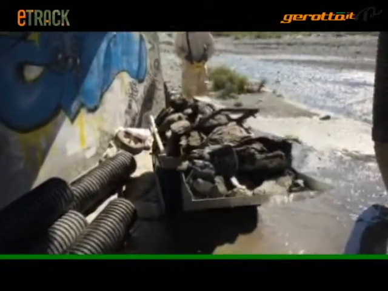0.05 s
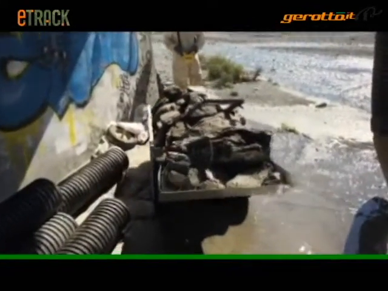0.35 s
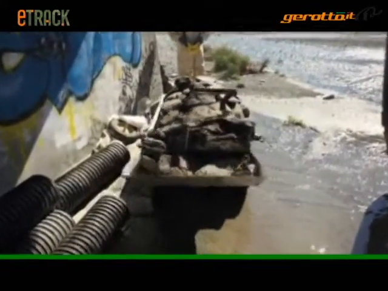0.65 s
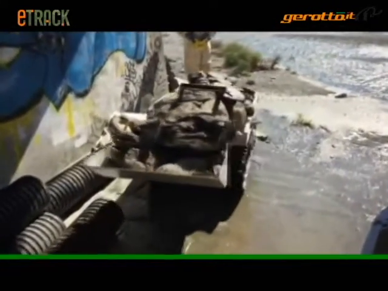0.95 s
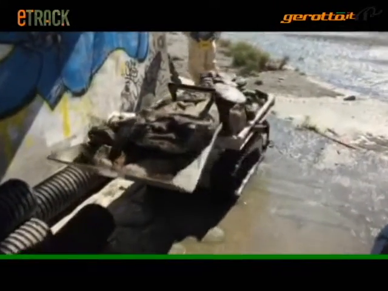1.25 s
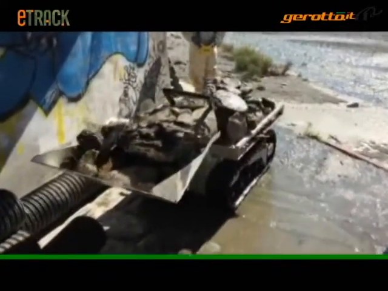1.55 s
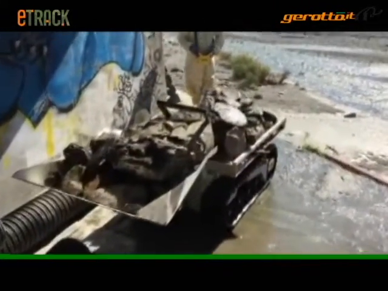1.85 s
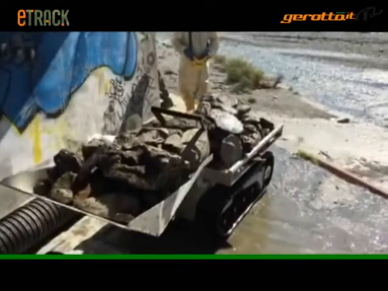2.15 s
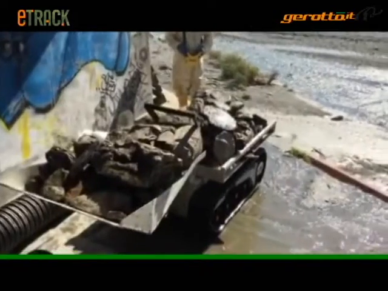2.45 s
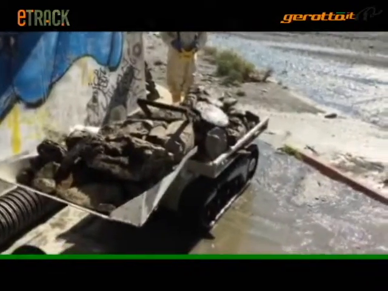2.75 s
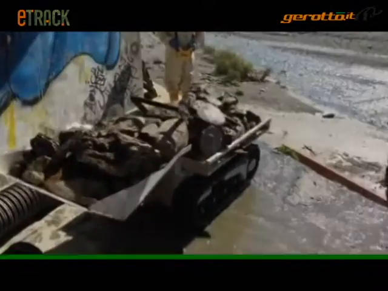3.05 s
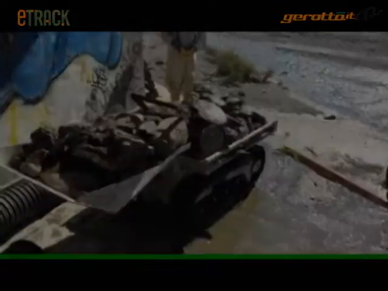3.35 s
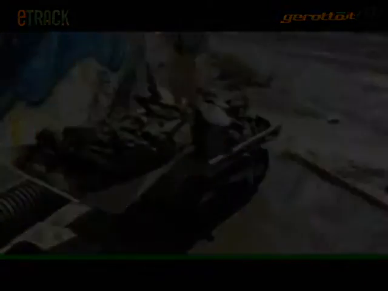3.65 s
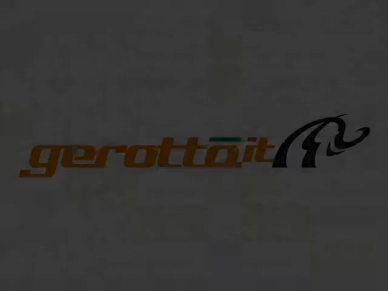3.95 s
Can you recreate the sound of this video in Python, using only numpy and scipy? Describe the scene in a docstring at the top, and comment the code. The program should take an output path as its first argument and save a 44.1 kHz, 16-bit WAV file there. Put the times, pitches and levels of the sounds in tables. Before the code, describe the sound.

A small tracked dozer grinds and rumbles close by on wet concrete outdoors. Steel scrapes, its loaded bucket clanks and thuds, and water hisses. It then creeps on more quietly with knocks and clinks before fading out.

```python
"""Tracks grind and rumble over a deep drive hum: a small dozer pivots on wet concrete beside a wall.
Sliding steel rasps and briefly squeals, the loaded bucket booms, thuds and clanks, and water sizzles.
The undercarriage knocks, stones crunch and track parts clink as the machine creeps forward and stops.
Friction and water are showers of tiny contacts; blows are clatters that set steel modes ringing.
The sound fades out at the end."""
import sys
import numpy as np
from scipy import signal
from scipy.fft import rfft, irfft
from scipy.io import wavfile
from scipy.ndimage import uniform_filter1d, map_coordinates

SR = 44100
rng = np.random.default_rng(int(sys.argv[2]) if len(sys.argv) > 2 else 0)


def persist_wave(psi):
    """Save psi, clipped to +-1, as 16-bit WAV."""
    counts = np.round(np.clip(psi, -1, 1) * 32767).astype(np.int16)
    wavfile.write(sys.argv[1], SR, np.atleast_2d(counts).T)


N = 176400
TOP_HZ = 10600  # the treble ends near here

# Modes of the bucket and hull. Each row: frequency in Hz, level in dB, t60 in seconds.
HULL_MODES = [(357, 1.5, 0.15), (405, -13.5, 0.25), (684, 0, 0.18), (897, -6.5, 0.19), (1008, -6.5, 0.12),
              (1180, -12.5, .2), (1424, -9.5, 0.25), (1537, -1, 0.14), (1644, -1, 0.062), (1826, -3, 0.1),
              (1910, -11, 0.15), (2343, -2, .17), (2307, -2, .3), (3176, -12, .2), (3640, 2, 0.12),
              (3957, 2, 0.098), (4410, -1.5, 0.22), (5200, -14, .2), (6158, -8.5, .14)]


def amp(db):
    """Decibels to gain."""
    return 10 ** (np.asarray(db) / 20)


def unit(x):
    """Scale to rms 1."""
    return x / np.sqrt(np.mean(x ** 2) + 1e-20)


def curves(rows):
    """One value per sample for each column after the time."""
    times, *columns = np.transpose(rows)
    return [np.interp(np.arange(N) / SR, times, column) for column in columns]


def wobble(rate):
    """A smooth random curve, rate knots a second."""
    return map_coordinates(rng.standard_normal(2000), [np.arange(N) * rate / SR], mode="wrap")


def coloured(x, colour, tilt_db=0):
    """x through an EQ curve of (Hz, dB) points and a tilt per octave, at rms 1."""
    hz = np.fft.rfftfreq(len(x), 1 / SR) + 1
    colour_hz, colour_db = np.transpose(colour)
    gain = amp(np.interp(np.log(hz), np.log(colour_hz), colour_db) + tilt_db * np.log2(hz / 1000))
    return unit(irfft(rfft(x) * gain * (hz < TOP_HZ + 500) * hz / (hz + 10), len(x)))


def add(track, start_s, x):
    """Mix x into the track at start_s."""
    start = max(0, round(start_s * SR))
    track[start:start + len(x)] += x[:max(0, N - start)]


def grains(rate, spread_db, size):
    """Random tiny contacts of unequal strength, rate a second."""
    hit = rng.random(size) < rate / SR
    sign = rng.choice([-1, 1], size)
    return unit(hit * sign * amp(spread_db * np.minimum(rng.exponential(size=size), 4)))


def ringing(x, modes):
    """x played into a set of decaying modes, at the same power."""
    t = np.arange(SR // 2) / SR
    ring = sum(amp(db - 60 * t / t60) * np.sin(2 * np.pi * (hz * t + rng.random()))
               for hz, db, t60 in modes)
    return unit(signal.fftconvolve(x, ring)[:len(x)]) * np.std(x)


def patchy(x, depth_db=3.3):
    """Narrow resonances come and go as the points of contact shift."""
    spectra = signal.stft(x, nperseg=1024)[2]
    patches = uniform_filter1d(rng.standard_normal(spectra.shape), size=3, axis=0)
    patches = uniform_filter1d(patches, size=11, axis=1)
    return unit(signal.istft(spectra * amp(depth_db * unit(patches)), nperseg=1024)[1][:len(x)])


def struck_spot(x, depth_db=2.8):
    """Each spot that is struck favours its own share of the many upper resonances."""
    hz = np.fft.rfftfreq(len(x), 1 / SR)
    ripple = map_coordinates(rng.standard_normal(300), [hz / 90], mode="wrap")
    return unit(irfft(rfft(x) * amp(depth_db * ripple * np.minimum(hz / 2500, 1)), len(x)))


def blows(rows, colour, modes, ring_db, attack_s, t60, tail_db, tail_t60):
    """Each blow is a short clatter that echoes off the wall and leaves the metal's modes ringing."""
    out, t = np.zeros(N), np.arange(SR // 2) / SR
    hz, mode_db, mode_t60 = np.transpose(modes)[:, :, None]
    colour_hz, colour_db = np.transpose(colour)
    struck_db = mode_db + np.interp(np.log(hz), np.log(colour_hz), colour_db)
    for start, db, length, *tilt in rows:
        after = np.maximum(t - length, 0)
        decay = np.hypot(amp(-60 * after / t60), amp(tail_db - 60 * after / tail_t60))
        envelope = (1 - np.exp(-t / attack_s)) * decay
        clatter = envelope * struck_spot(coloured(grains(9000, .8, len(t)), colour, *tilt))
        gains = amp(struck_db + sum(tilt) * np.log2(hz / 1000) + rng.normal(0, 3.9, hz.shape))
        waves = amp(-60 * after / mode_t60) * np.sin(2 * np.pi * (hz * t + rng.random(hz.shape)))
        ring = np.minimum(t / length, 1) * np.sum(gains * waves, axis=0) / np.linalg.norm(gains)
        add(out, start, amp(db) * (clatter + amp(ring_db) * ring))
    return out


def bursts(rows, colour, rate, spread_db, attack_s, t60):
    """Short showers of grains that rise, hold and die away without ringing."""
    out, t = np.zeros(N), np.arange(SR // 4) / SR
    for start, db, length in rows:
        envelope = (1 - np.exp(-t / attack_s)) * amp(db - 60 * np.maximum(t - length, 0) / t60)
        add(out, start, envelope * struck_spot(coloured(grains(rate, spread_db, len(t)), colour)))
    return out


def tracks():
    """The tracks rumble, and stick and slip over grit that shakes the hull."""
    # Rolling tracks. Each row: time in seconds, then rumble, grind and grit faders in dB.
    faders = [(0, -34, -29, -35.5), (.15, -40, -29, -38.5), (.21, -35, -32.5, -39.5),
              (.34, -34, -34, -36.5), (.45, -36, -31, -37.5), (.52, -34.5, -30.5, -33.5),
              (.61, -46, -32.5, -38.5), (.74, -32.5, -35, -34), (.82, -37, -35.5, -41.5),
              (1.02, -43.5, -33.5, -34), (1.21, -43, -32.5, -38.5), (1.46, -36.5, -37, -39),
              (1.72, -43, -38, -41.5), (2.09, -39, -43, -47), (2.37, -43, -40, -45.5),
              (2.48, -36.5, -42, -38.5), (2.55, -40, -39, -39.5), (2.8, -37, -40.5, -48.5),
              (2.96, -41, -38.5, -45.5), (3.14, -41.5, -40.5, -42), (3.27, -38.5, -38.5, -42.5),
              (3.39, -47, -39, -44), (3.58, -48, -44.5, -47.5), (3.88, -35, -40, -45)]
    # Low rumble, midrange grind, bright grit. Each row: frequency in Hz, gain in dB.
    rumble_eq = [(25, -30), (45, -3.5), (75, 3), (125, -0.5), (200, 0), (280, -6.5), (450, -17), (900, -56)]
    grind_eq = [(120, -54), (250, -4), (330, -0.5), (470, -8), (560, -1), (670, -2.5), (830, -0.5),
                (1000, -3), (1200, -18), (2000, -21), (5000, -69)]
    grit_eq = [(600, -17.5), (1150, 1.5), (1800, -1), (2350, -1), (2700, -4.5), (4200, -11.5), (5000, -18),
               (6000, -18.5), (7500, -35.5), (10000, -41.5)]
    rumble_db, grind_db, grit_db = curves(faders)
    grind_trim_db, grit_trim_db = 1, 1.32
    judder_db = 1.7 * wobble(27.916)
    rumble = coloured(grains(1100, 2, N), rumble_eq) * amp(rumble_db + 2.3 * wobble(33))
    slips = coloured(grains(1500, 0.72, N), grind_eq)
    hull = amp(-9) * ringing(slips, HULL_MODES)
    grind = unit(slips + hull) * amp(grind_db + grind_trim_db + judder_db)
    grit = patchy(coloured(grains(2500, 0.64, N), grit_eq)) * amp(grit_db + grit_trim_db + judder_db)
    return rumble + grind + grit


def drive():
    """A deep hum that sags under load, with wavering drones of the frame."""
    # Drive hum. Each row: time in seconds, pitch in Hz, level in dB.
    hum_path = [(0, 49.8, -58), (.25, 48.2, -68), (.4, 46.7, -37), (.56, 47.3, -46), (.8, 47.7, -38),
                (1.15, 46.3, -36.5), (1.35, 45.84, -38.5), (2.1, 43.4, -39), (2.36, 44.04, -47),
                (2.6, 43.4, -41), (3.2, 45.5, -41), (3.5, 46.2, -52)]
    # Frame drones. Each row: pitch in Hz, level in dB.
    drones = [(79, -48.5), (105, -52), (150, -55.5), (188, -58.5)]
    hz, db = curves(hum_path)
    hum = amp(db + 0.5 * wobble(17)) * np.sin(2 * np.pi * np.cumsum(hz + 0.4 * wobble(32)) / SR)
    for drone_hz, drone_db in drones:
        swell = amp(drone_db + 7.7 * wobble(6))
        pitch = drone_hz * (1 + 0.0215 * wobble(13))
        hum += swell * np.sin(2 * np.pi * np.cumsum(pitch) / SR)
    return np.sqrt(2) * hum


def water():
    """Water and wet sand sizzle as the tracks squeeze them out."""
    # Swell of the sizzle. Each row: time in seconds, level in dB.
    fader = [(0, -43.5), (.08, -54.5), (.43, -55), (.52, -36.5), (.6, -48.5), (.74, -47), (.85, -48),
             (1.06, -40.5), (1.12, -40.5), (1.21, -43.5), (1.28, -38), (1.35, -43), (1.4, -44), (1.47, -42),
             (1.53, -46.5), (1.67, -45), (1.77, -54), (1.83, -46), (1.91, -57), (1.97, -50), (2.07, -53.5),
             (2.2, -61.5), (2.39, -63), (2.49, -47), (2.62, -66), (2.95, -68), (3.05, -52), (3.3, -52.5),
             (3.47, -54.5), (3.62, -63), (3.85, -64)]
    # Fine spray. Each row: frequency in Hz, gain in dB.
    eq = [(1500, -15), (3500, 0), (6000, 0.5), (7700, -1.5), (9300, -0.5), (10500, -6.5)]
    db, = curves(fader)
    return patchy(coloured(grains(6000, 1.0, N), eq)) * amp(db + 2.47 * wobble(35.64))


def bucket_boom(flutter_db=1.8):
    """Sideways sliding makes the loaded bucket boom."""
    # Swell of the boom. Each row: time in seconds, level in dB.
    fader = [(0, -47), (.2, -40), (.32, -31), (.6, -40), (.9, -36), (1.1, -36), (1.45, -43.5),
             (1.75, -46.5), (2.2, -53.5), (3.6, -42.5)]
    # The bucket's low body. Each row: frequency in Hz, gain in dB.
    eq = [(90, -30.5), (150, -0.5), (220, -0.5), (280, -3), (365, -7.5), (420, 0.5), (520, -16),
          (900, -24.5), (3000, -60.5)]
    db, = curves(fader)
    return coloured(grains(600, 2.2, N), eq) * amp(db + flutter_db * wobble(22))


def scrape():
    """Steel rasps sideways as the machine pivots and bows the hull's modes."""
    # Swell of the scrape. Each row: time in seconds, level in dB.
    fader = [(0, -74), (.3, -39.5), (.6, -35), (.8, -42), (1.05, -31), (1.3, -45), (1.7, -48), (2.2, -62),
             (2.45, -50), (2.8, -70.5), (3.15, -60.5), (3.6, -73)]
    # Rasping steel. Each row: frequency in Hz, gain in dB.
    eq = [(600, -29), (1400, 2.5), (1850, 11.5), (2400, -8), (3700, -13.5), (6000, -17.5), (9000, -18.5)]
    db, = curves(fader)
    rasp = coloured(grains(1500, 2.4, N), eq)
    return unit(ringing(rasp, HULL_MODES) + .5 * rasp) * amp(db)


def clanks():
    """Hard blows and short scrapes set the bucket ringing."""
    # Each row: start in seconds, level in dB, length in seconds, brightness in dB per octave.
    hits = [(.003, -42, 0.019, 15), (.083, -29, 0.0034, -0.5), (.264, -30, 0.0055, 7),
            (.279, -19.5, 0.015, -0.5), (.304, -30.5, .008, 2), (.375, -29.5, 0.025, -3),
            (.546, -24.5, 0.015, -1.5), (.702, -35, 0.041, -1), (.85, -20.5, 0.0049, -0.5),
            (.93, -33.5, 0.013, 0.5), (1.032, -20.5, 0.022, 1), (1.515, -25.5, 0.028, -1.5),
            (1.945, -40.5, 0.016, 1), (2.078, -36.5, 0.013, -1), (2.4, -37, 0.037, -1),
            (2.448, -38.5, 0.048, -5), (2.69, -38.5, 0.0098, 0.5), (3.241, -42.5, 0.029, 11),
            (3.312, -43.5, 0.015, 13)]
    # A hard blow on the bucket. Each row: frequency in Hz, gain in dB.
    eq = [(80, -8.5), (250, -6.5), (700, 3), (1200, 0), (1750, -1), (2300, -2), (2800, -8.5), (3850, -4.5),
          (4400, -8), (5200, -16.5), (7000, -31.5), (10000, -45)]
    return blows(hits, eq, HULL_MODES, ring_db=-3, attack_s=.0008, t60=.085,
                 tail_db=-16.5, tail_t60=.65)


def knocks():
    """The undercarriage knocks hollowly, each time at its own pitch."""
    # Each row: start in seconds, level in dB, length in seconds, pitch in Hz.
    hits = [(0.261, -25, .008, 750), (.293, -17.5, 0.0032, 940), (.857, -22.5, 0.0067, 956),
            (1, -29, 0.021, 686), (1.04, -33, 0.021, 710), (1.389, -32, 0.0068, 686),
            (1.748, -53, 0.0081, 700), (2.204, -41, 0.018, 702), (2.453, -37.5, 0.025, 700),
            (2.699, -33, 0.025, 730), (3.006, -39.5, 0.031, 840), (3.237, -30.5, 0.026, 680),
            (3.324, -41, .012, 760)]
    # A hollow body. Each row: multiple of the pitch, gain in dB.
    eq = [(.12, -3), (.3, -16), (.62, -4.5), (.93, 9), (1.2, 1.5), (1.55, -10), (3.5, -17.5), (8.5, -60.5)]
    return sum(blows([hit], np.multiply(eq, [hz, 1]), HULL_MODES, ring_db=-6, attack_s=.0015,
                     t60=.047, tail_db=-16, tail_t60=.48) for *hit, hz in hits)


def thuds():
    """The load thuds in the bucket, which rings only faintly."""
    # Each row: start in seconds, level in dB, length in seconds.
    hits = [(.281, -29, 0.014), (.405, -31, 0.021), (.545, -28.5, 0.02), (1.0, -23, 0.034),
            (1.062, -28.5, 0.032), (1.297, -24.5, 0.016), (1.352, -28.5, 0.015), (3.265, -42, 0.023)]
    # A dull blow. Each row: frequency in Hz, gain in dB.
    eq = [(60, -17), (150, -2.5), (260, -4), (370, 10.5), (500, -2), (680, 3), (1000, -34), (2000, -39),
          (6000, -61.5)]
    return blows(hits, eq, HULL_MODES, ring_db=-7, attack_s=.00081, t60=.13, tail_db=-17, tail_t60=.25)


def squeals(flutter_db=3):
    """A track sticks and slips into a short, rough tone that swells, creeps upward and fades."""
    # Each row: start in seconds, length in seconds, pitch in Hz, level in dB.
    tones = [(0.461, 0.19, 998, -22), (.8, 0.057, 1840, -30.5), (.985, 0.051, 1850, -37)]
    rise, jitter, waver = .012, .023, .004  # shares of the pitch
    out = np.zeros(N)
    for start, length, hz, db in tones:
        n = int(length * SR)
        along = np.arange(n) / n
        pitch = hz * (1 + rise * (along - .5) + jitter * wobble(500)[:n] + waver * wobble(38)[:n])
        envelope = np.sin(np.pi * along) * amp(db + flutter_db * wobble(122)[:n])
        add(out, start, envelope * np.sin(2 * np.pi * np.cumsum(pitch) / SR))
    return out


def crunches():
    """Stones are crushed under a track in showers of tiny cracks."""
    # Each row: start in seconds, level in dB, length in seconds.
    stones = [(.705, -35, 0.042), (.748, -27, 0.016), (.866, -33, .018), (1.125, -37.5, .05),
              (1.518, -35, 0.028), (2.398, -41, 0.025), (2.45, -37.5, 0.039)]
    # Breaking stone. Each row: frequency in Hz, gain in dB.
    eq = [(600, -29.5), (1100, -2.5), (1400, 4.5), (1800, 1), (2350, -1.5), (2900, -6.5), (4500, -27),
          (8000, -41.5)]
    return bursts(stones, eq, rate=2200, spread_db=-2.5, attack_s=.0032, t60=.11)


def clinks():
    """Free steel parts ring on; those that stay in contact only click."""
    # Each row: start in seconds, level in dB, length in seconds, tilt in dB per octave, ring in dB.
    hits = [(.849, -30, 0.0037, 1.5, -10), (1.031, -27, 0.011, -0.5, 4), (1.113, -33, 0.008, 5, -2),
            (1.954, -46.5, 0.012, 22, -8), (2.0916, -30.5, 0.0022, -0.5, -7), (2.483, -40, 0.0081, 8, -4),
            (2.967, -41.5, 0.0046, -5.5, 4), (2.99, -24, 0.0087, -3, 2.5), (3.008, -29, 0.011, -3.5, -4.5),
            (3.544, -53, 0.0099, 25, -7), (3.687, -40, 0.0058, 7, -8)]
    # A bright steel contact. Each row: frequency in Hz, gain in dB.
    eq = [(300, -27), (900, -6.5), (1400, -7), (1900, -6), (3000, -1), (3350, -0.5), (3850, 0.5), (4650, 0),
          (5150, -0.5), (5500, -1.5), (5950, 1.5), (7200, -11.5), (10000, -13)]
    # Modes of the track parts. Each row: frequency in Hz, level in dB, t60 in seconds.
    steel_modes = [(1875, 5.5, 0.071), (2342, -7.5, .42), (2986, -3, 0.36), (2938, 0, 0.2),
                   (3580, -11.5, 0.34), (3850, 1, 0.029), (4260, -11, 0.12), (5120, -2.5, 0.1),
                   (5120, -2.5, 0.17), (5980, -5, 0.15), (7100, -3, .17)]
    return sum(blows([hit], eq, steel_modes, ring_db, attack_s=.00066, t60=.073,
                     tail_db=-13.5, tail_t60=.35) for *hit, ring_db in hits)


def spurts():
    """Water spurts from under a track in short hisses."""
    # Each row: start in seconds, level in dB, length in seconds.
    jets = [(.945, -41, 0.016), (1.012, -41, .015), (1.084, -37, 0.011), (1.155, -39.5, 0.009),
            (1.25, -37, 0.011), (1.291, -35.5, .009), (1.312, -40, 0.02), (1.408, -47.5, 0.026),
            (1.487, -43, .03), (1.602, -53, .015), (1.722, -49, 0.017)]
    # Hissing water. Each row: frequency in Hz, gain in dB.
    eq = [(2500, -21), (4500, -3), (6300, 10), (8000, 0), (9500, 6), (10500, -11.5)]
    return bursts(jets, eq, rate=4400, spread_db=1, attack_s=.0035, t60=.062)


def scene():
    """The moving machine with all its knocks, in mono."""
    bucket_hits = thuds() + clanks()
    ground = crunches() + spurts()
    motion = drive() + tracks() + bucket_boom() + scrape() + water()
    undercarriage = squeals() + knocks() + clinks()
    return (bucket_hits + ground + motion + undercarriage)[None]


def record(dry):
    """A fade to silence and a steep cut of the top treble."""
    # Master fade. Each row: time in seconds, gain in dB.
    fader = [(0, -2), (3.5, -2.5), (3.72, -7.5), (3.82, -13.5), (3.9, -20)]
    end_s, cutoff_hz = 3.903, TOP_HZ - 250
    fade_db, = curves(fader)
    faded = dry * amp(fade_db) * np.clip((end_s - np.arange(N) / SR) / .004, 0, 1)
    hz = np.fft.rfftfreq(2 * N, 1 / SR)
    return irfft(rfft(faded, 2 * N) / np.sqrt(1 + (hz / cutoff_hz) ** 90))[:, :N]


dry = scene()
out = record(dry)
persist_wave(out)
```